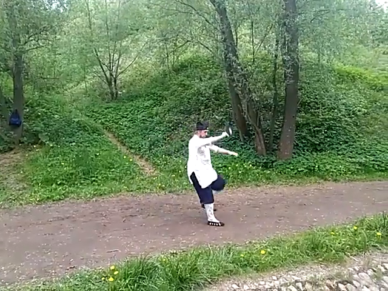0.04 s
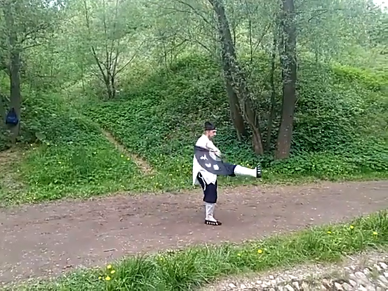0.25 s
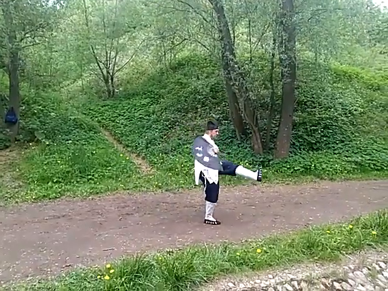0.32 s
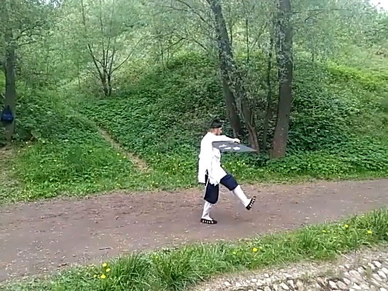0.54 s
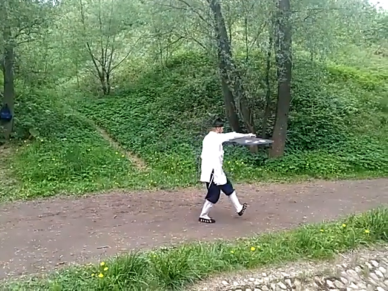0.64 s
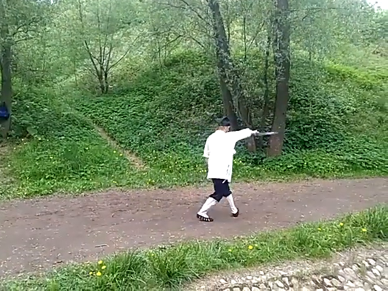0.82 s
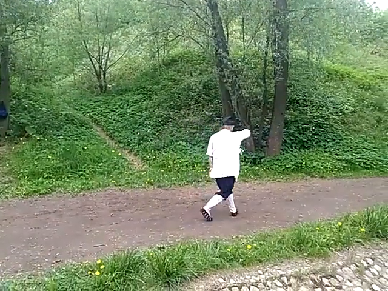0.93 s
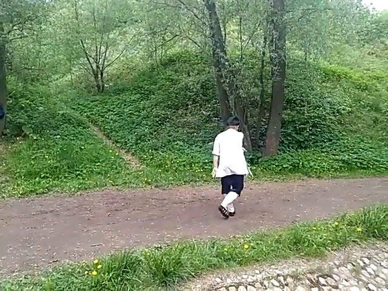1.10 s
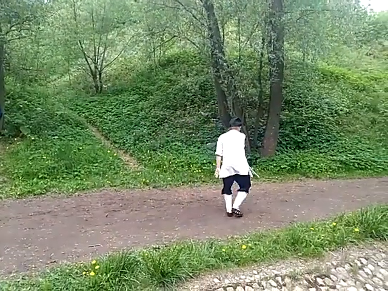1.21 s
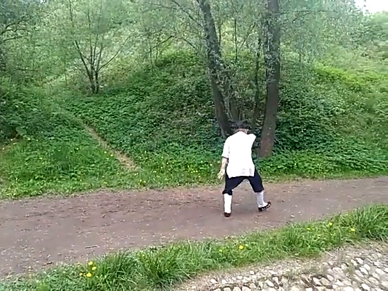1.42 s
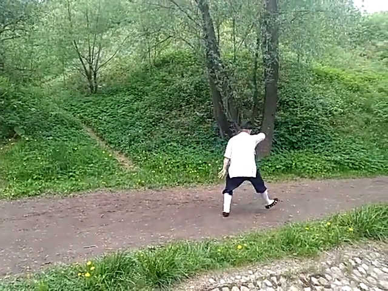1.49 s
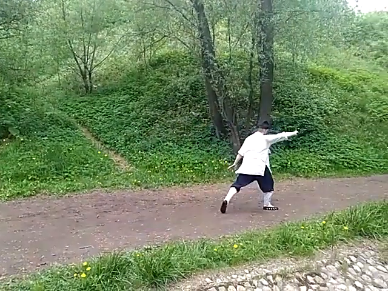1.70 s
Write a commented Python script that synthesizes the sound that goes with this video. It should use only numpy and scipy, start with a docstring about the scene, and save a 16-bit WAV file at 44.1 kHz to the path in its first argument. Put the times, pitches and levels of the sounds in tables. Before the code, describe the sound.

A large folding fan cracks open at about 0.22 to 0.28 seconds, a dense burst of low cloth flaps and bright rib clacks, with a tiny click near 0.38. Clothes swish and shoes scuff just before. Trees return a short, diffuse echo. Faint scuffs and rustles follow around 0.8 to 1.25, with raspy birds chattering from 0.7 and small clear chirps near 1.6, over soft air and distant low rumble.

```python
"""Folding fan flicked open by a wood

A large folding fan is flicked open on a dirt path: cloth flaps and rib clacks are blows on ringing modes.
The bank and trees throw the crack back, as a few delayed copies and a tail of filtered noise.
Shoes, rustles and swishing clothes are coloured noise that swells and fades. Birds chirp and chatter in
gliding, often raspy tones over a blur of song. Air, a low far rumble and a faint rising drone lie beneath."""
import sys
import numpy as np
from scipy import signal
from scipy.fft import rfft, irfft
from scipy.io import wavfile

SR = 44100
rng = np.random.default_rng(int(sys.argv[2]) if len(sys.argv) > 2 else 0)


def int16_out(signal):
    """Quantize to a 16-bit WAV file."""
    q = np.round(np.clip(np.atleast_2d(signal).T, -1, 1) * 32767)
    wavfile.write(sys.argv[1], SR, q.astype(np.int16))


N = 77175
TIME = np.arange(N) / SR  # seconds


def from_db(db):
    """Turn decibels into a multiplier."""
    return 10 ** (np.asarray(db) / 20)


def unit(x):
    """Scale a sound so that its squared samples add up to one."""
    return x / np.sqrt(np.sum(x ** 2) + 1e-20)


def butter(x, hz, kind, order=2):
    """Keep the low, high or middle band of a sound with a Butterworth filter."""
    safe_hz = np.clip(hz, 10, .45 * SR)
    sections = signal.butter(order, safe_hz, kind, fs=SR, output="sos")
    return signal.sosfilt(sections, x)


def level(curve):
    """Draw a loudness curve through points of time and decibels."""
    times, db = np.transpose(curve)
    return from_db(np.interp(TIME, times, db))


def noise(colour, grain_db=0):
    """Make noise with a given spectrum and an rms of one; uneven sample sizes make it gritty."""
    hz, db = np.transpose(colour)
    unevenness = np.minimum(rng.exponential(1, N), 6)
    white = rng.standard_normal(N) * from_db(grain_db * unevenness)
    bin_hz = np.fft.rfftfreq(N, 1 / SR)
    gain = from_db(np.interp(np.log(bin_hz + 1), np.log(hz), db))  # +1 avoids log(0)
    return unit(irfft(rfft(white) * gain, N)) * np.sqrt(N)


def add(out, start_s, sound):
    """Mix a sound in at a given time, cutting off what runs past the end."""
    i = max(int(start_s * SR), 0)
    out[i:i + len(sound)] += sound[:N - i]


# colour of the air: f/Hz, relative level/dB
AIR_COLOUR = [(25, -13.5), (100, -7), (170, -6.5), (400, -9.5), (1000, -12), (2000, -14), (4000, -12),
              (6000, -36.5), (8200, -20), (10000, -34), (14000, -38)]


def air():
    """The steady hiss of open air: noise with a fixed spectrum."""
    return from_db(-62) * noise(AIR_COLOUR)


# colour of the far rumble, strongest near 58 Hz: f/Hz, relative level/dB
RUMBLE_COLOUR = [(20, -39), (38, -26.5), (58, 0), (75, -9.5), (110, -12.5), (170, -31), (400, -59.5)]


def rumble():
    """A low far rumble: noise kept to the deep bass."""
    return from_db(-61.5) * noise(RUMBLE_COLOUR)


def swells(rows):
    """Each stroke of rubbing rises to its height and falls away, both exponentially."""
    total = np.zeros(N)
    for peak_s, db, rise_s, fall_s in rows:
        distance = np.maximum((peak_s - TIME) / rise_s, (TIME - peak_s) / fall_s)
        total += from_db(db) * np.exp(-distance)
    return total


# loudness of the clothes in the wind-up: t/s, level/dB
SWISH_LEVEL = [(0, -60), (.04, -58), (.11, -63.5), (.13, -50.5), (.16, -54.5), (.21, -56), (.27, -65.5),
               (.45, -77.5)]
# colour of the cloth rubbing: f/Hz, relative level/dB
SWISH_COLOUR = [(70, -9), (220, -3), (500, -10.5), (750, 0), (1300, -7.5), (2000, 0), (3000, -15),
                (7000, -8.5), (14000, -32.5)]


def swish():
    """Clothes rub as the arm winds up: slightly gritty noise that follows a loudness curve."""
    return level(SWISH_LEVEL) * noise(SWISH_COLOUR, grain_db=2.5)


# strokes of the shoes: t/s at the height, level/dB, rise/s, fall/s
SCUFF_STROKES = [(.04, -51.5, 0.039, 0.066), (.20, -53.5, 0.04, 0.09), (.86, -65.5, .08, 0.07),
                 (1.039, -58, 0.059, 0.077), (1.208, -48, 0.004, 0.011), (1.237, -51.5, .008, 0.017),
                 (1.33, -68, 0.042, 0.034), (1.46, -65.5, 0.043, 0.065)]
# colour of the grit: f/Hz, relative level/dB
GRIT_COLOUR = [(300, -38), (1500, -11), (4000, -5), (6500, -7), (8200, 1.5), (9500, -9.5), (11000, -16.5),
               (14000, -32)]


def scuffs():
    """Soles grind on grit: very uneven noise in swelling strokes."""
    return swells(SCUFF_STROKES) * noise(GRIT_COLOUR, grain_db=4)


# short rustles: t/s at the height, level/dB, rise/s, fall/s
RUSTLE_STROKES = [(.045, -43, 0.0024, 0.0098), (.812, -52, 0.0018, 0.0058), (.868, -60, 0.0064, 0.0064),
                  (1.037, -56, 0.0074, 0.015), (1.236, -58, 0.0053, 0.0062)]
# their thin, bright colour: f/Hz, relative level/dB
RUSTLE_COLOUR = [(3000, -23), (6500, -32), (7600, 2), (8500, 0.5), (10300, -19), (14000, -29)]


def rustles():
    """Short, thin rustles: bright noise in quick strokes."""
    return swells(RUSTLE_STROKES) * noise(RUSTLE_COLOUR, grain_db=2)


# blurred birdsong deep in the wood: t/s, level/dB
CHORUS_LEVEL = [(0, -86), (.12, -66), (.15, -57), (.3, -50.5), (.55, -56), (.64, -66), (.715, -76),
                (.735, -58.5), (.9, -55), (1.04, -58), (1.11, -72), (1.19, -87), (1.21, -56.5),
                (1.4, -54.5), (1.5, -56), (1.56, -62), (1.75, -76.5)]
# its colour, strongest near 4 kHz: f/Hz, relative level/dB
CHORUS_COLOUR = [(1500, -24.5), (2500, -11.5), (3300, -9.5), (4250, -2.5), (5400, -8), (6500, -17),
                 (9000, -28.5), (14000, -44.5)]


def chorus():
    """Many songs blur together: noise in the birds' range that swells and fades."""
    return level(CHORUS_LEVEL) * noise(CHORUS_COLOUR, grain_db=3)


def note(length_s, start_hz, end_hz, rasp):
    """A gliding tone swells and fades; fast random changes of strength make it harsh."""
    t = TIME[:int(length_s * SR)]
    rasp = np.clip(rasp, 0, 1)  # 0 is clear, 1 is all rasp
    pitch_hz = np.geomspace(start_hz, end_hz, len(t))
    tone = np.sqrt(2) * np.sin(2 * np.pi * np.cumsum(pitch_hz) / SR)
    flutter = unit(butter(rng.standard_normal(len(t)), 630, "low")) * np.sqrt(len(t))
    strength = np.sqrt(1 - rasp ** 2) + rasp * flutter
    return tone * strength * np.sin(np.pi * t / length_s)


# near bird notes: t/s, length/s, start f/Hz, end f/Hz, level/dB, rasp (0 to 1)
CHIRP_NOTES = [(0.157, 0.022, 5110, 5074, -45.5, 0.64), (1.49, 0.034, 7530, 7260, -63.5, 0.6),
               (1.592, 0.012, 1817, 1460, -51, 0.04), (1.6, 0.0087, 1393, 1600, -48, 0),
               (1.6132, 0.006, 2436, 1890, -40, 0.1), (1.620, 0.0061, 1800, 1596, -41, 0.26),
               (1.624, 0.0108, 1510, 1050, -55, 0.6)]


def chirps():
    """Near birds chirp: short gliding notes, some clear and some raspy."""
    out = np.zeros(N)
    for start_s, length_s, start_hz, end_hz, db, rasp in CHIRP_NOTES:
        add(out, start_s, from_db(db) * note(length_s, start_hz, end_hz, rasp))
    return out


# harsh falling notes of a far bird: t/s, level/dB, end f/Hz
CHATTER_NOTES = [(0.72, -58, 2503), (.757, -54, 2100), (.830, -61, 2940), (.867, -52, 1940),
                 (.928, -54, 2187), (.971, -52.5, 1790), (1.027, -56.5, 3290), (1.196, -55, 1300),
                 (1.227, -56, 1498), (1.300, -56, 2190), (1.343, -51.5, 2582), (1.402, -51, 3040),
                 (1.446, -53.5, 1683)]


def chatter():
    """A far bird chatters: equally short notes fall from one high pitch, all rasp."""
    out = np.zeros(N)
    for start_s, db, end_hz in CHATTER_NOTES:
        add(out, start_s, from_db(db) * note(.029, 5430, end_hz, rasp=1))
    return out


# scatter from the wood: f/Hz, early level/dB, late level/dB, late time to fall 60 dB/s
WOOD_BANDS = [(149.3, -8, -12, 1), (400, -19, -24, 0.48), (1200, -10.5, -12, 0.67),
              (3590, -11.5, -17.5, 0.76), (7800, -11, -10.5, 0.41), (14000, -7.5, -8, 0.46)]
EARLY_T60_S, SCATTER_DELAY_S, SCATTER_RISE_S = 0.15, 0.0027, 0.006


def wood(x, early_share=1):
    """Ground, bank and foliage scatter sound: a quick dense part and a longer tail, band by band."""
    hz, *columns = np.transpose(WOOD_BANDS)
    t, response = TIME[:SR], np.zeros(SR)
    edges = np.geomspace(100, 16000, 14)
    onset = 1 - np.exp(-np.maximum(t - SCATTER_DELAY_S, 0) / SCATTER_RISE_S)
    for low, high in zip(edges, edges[1:]):
        log_centre = np.log(low * high) / 2
        early_db, late_db, late_t60 = [np.interp(log_centre, np.log(hz), c) for c in columns]
        early = unit(onset * np.exp(-np.log(1000) * t / EARLY_T60_S))  # a factor of 1000 is 60 dB
        late = unit(onset * np.exp(-np.log(1000) * t / late_t60))
        envelope = np.hypot(early_share * from_db(early_db) * early, from_db(late_db) * late)
        response += butter(rng.standard_normal(SR), [low, high], "band") * envelope
    return signal.fftconvolve(x, response)[:N]


def birds():
    """Chirps and chatter ring in the trees, and again a moment later, beside the blur of song."""
    calls = chirps() + chatter()
    out = calls + from_db(3.5) * wood(calls)
    add(out, .056, from_db(2.5) * wood(calls))
    return out + chorus()


def strikes(rows, modes, rattle_s, detune=0):
    """Each blow, a click and a brief rattle, sets fading modes ringing."""
    out, t = np.zeros(N), TIME[:SR // 16]
    for start_s, db, tilt, rattle_db in rows:
        push = from_db(rattle_db) * unit(rng.standard_normal(len(t)) * np.exp(-t / rattle_s))
        push[0] += 1  # the click
        tuning = 1 + detune * rng.standard_normal(len(modes))
        body = np.zeros(len(t))
        for k, (hz, mode_db, t60) in enumerate(modes):
            fade = from_db(mode_db + tilt * np.log2(hz / 1000) - 60 * t / t60)
            body += (-1) ** k * fade * np.sin(2 * np.pi * hz * tuning[k] * t)
        blow = unit(signal.fftconvolve(push, body)[:len(t)])
        # the level is the rms if all the energy fell within 3 ms
        add(out, start_s, from_db(db) * np.sqrt(.003 * SR) * blow)
    return out


# jerks of the cloth: t/s, level/dB before filtering, tilt/dB per octave, rattle/dB against the click
FLAP_BLOWS = [(.2150, -34.5, -5, 0), (.2182, -31, 4.5, -7.5), (.2255, -31.5, 4, 4.5), (.2297, -17.5, 2, 1),
              (.2338, -24, 1.5, -10), (.2455, -21.5, -2.5, -17), (.2480, -28.5, -7.5, -5.5),
              (.2598, -21, 3, -1.5), (.2618, -27, 3.5, -11), (.2738, -26.5, 0.5, -0.5),
              (.2935, -33.5, 1, 8), (.3105, -34, -3, 11), (.336, -50, -9, -45)]
# ringing modes of the cloth: f/Hz, relative level/dB, time to fall 60 dB/s
CLOTH_MODES = [(105, -30.5, .06), (225, -10, .05), (310, -3.5, 0.066), (486, 2, 0.025), (802, 2, 0.017),
               (1070, 0, 0.016), (1360, 1.5, 0.009), (1805, -2, 0.015), (2495, -7.5, 0.011)]


def cloth_flaps():
    """The cloth is jerked taut and flutters out: blows on low, quickly fading modes."""
    return butter(strikes(FLAP_BLOWS, CLOTH_MODES, rattle_s=0.0041), hz=89, kind="high")


# clacks of the ribs: t/s, level/dB before filtering, tilt/dB per octave, rattle/dB against the click
CLACK_BLOWS = [(.2188, -34.5, -5, -1.5), (.2290, -35, 6, -3), (.2307, -20.5, -1.5, 1),
               (.2324, -25, -9.5, -0.5), (.2358, -28, -3, 6.5), (.2461, -27, 0, -0.5),
               (.2500, -29.5, -3.5, 4), (.2600, -13, 4, -6), (.2610, -20, -9, -11.5),
               (.2618, -15.5, 3.5, -2.5), (.2638, -23, 6, -5), (.2662, -23, -11.5, 5.5),
               (.2755, -33, -4, 10), (.2855, -34.5, 11, 3), (.3845, -39, 12, 3)]
# ringing modes of the ribs: f/Hz, relative level/dB, time to fall 60 dB/s
RIB_MODES = [(2360, -8.5, .007), (3312, -3, 0.0082), (3620, -2.5, 0.0088), (4396, -7, 0.012),
             (5480, -3.5, .004), (6430, 2, 0.0026), (7350, 1.5, 0.0046), (7850, -1.5, 0.0061),
             (8830, -5, 0.0031), (10300, -14.5, 0.0018), (12700, -23.5, 0.0015)]


def rib_clacks():
    """The ribs clack against their stop: bright modes, retuned a little as each rib differs."""
    clacks = strikes(CLACK_BLOWS, RIB_MODES, rattle_s=.0025, detune=0.027)
    return butter(clacks, hz=1180, kind="high")


def fan():
    """Cloth and ribs are heard directly, with the extreme treble softened."""
    return butter(cloth_flaps() + rib_clacks(), hz=12500, kind="low")


def scatter(count):
    """The fan throws a slightly different clatter in each direction of the wood."""
    return sum(wood(fan()) for _ in range(count)) / np.sqrt(count)


# reflections from the bank and trunks: delay/s, level/dB, low-pass f/Hz
REFLECTIONS = [(0.0246, -23, 9600), (.0335, -25, 5940)]


def echoes(x):
    """The bank and trunks return distinct copies: later, quieter and duller."""
    out = np.zeros(N)
    for delay_s, db, hz in REFLECTIONS:
        add(out, delay_s, from_db(db) * butter(x, hz, "low"))
    return out


def drone():
    """A faint far drone rises slightly: one long, raspy gliding note."""
    out = np.zeros(N)
    add(out, 1.33, from_db(-68.5) * note(.4, 400, 423, rasp=0.83))
    return out


def surroundings():
    """Everything but the fan sounds together."""
    movement = swish() + scuffs() + rustles()
    return air() + rumble() + movement + birds() + drone()


def scene():
    """The fan is dead centre; only the treble of its late tail and of the surroundings has width."""
    snap = fan()
    mid = snap + echoes(snap) + scatter(count=3) + surroundings()
    wide = wood(fan(), early_share=0) + surroundings()  # fresh random draws, unlike the middle
    side = from_db(-7.5) * butter(wide, 6340, "high", order=8)
    return np.array([mid + side, mid - side])


def record(dry):
    """Peaks are rounded smoothly towards a ceiling, then the extreme treble is cut."""
    ceiling = .85
    rounded = dry / (1 + (dry / ceiling) ** 4) ** .25
    # 60 dB down from 15400 Hz upward
    treble_cut = signal.cheby2(12, 60, 15400, fs=SR, output="sos")
    return signal.sosfilt(treble_cut, rounded)


dry = scene()
out = record(dry)
int16_out(out)
```